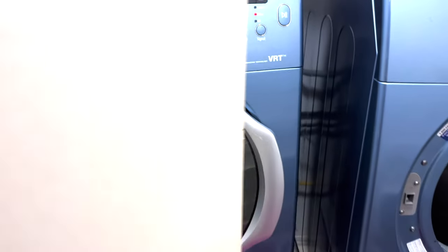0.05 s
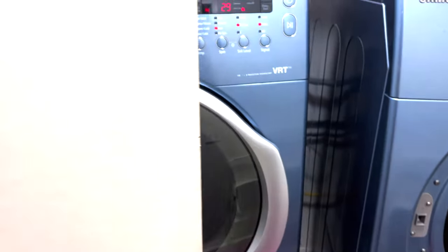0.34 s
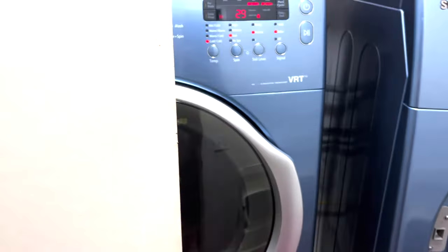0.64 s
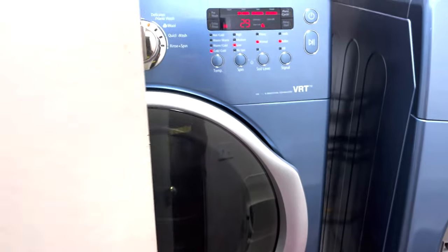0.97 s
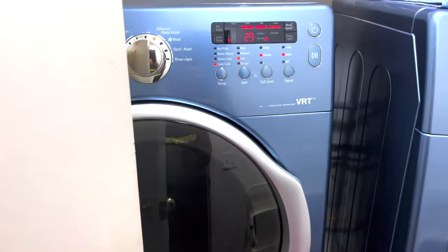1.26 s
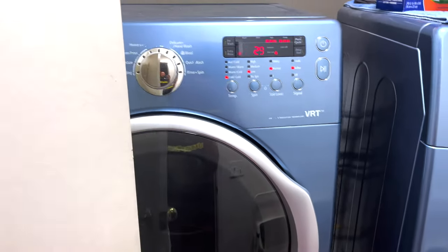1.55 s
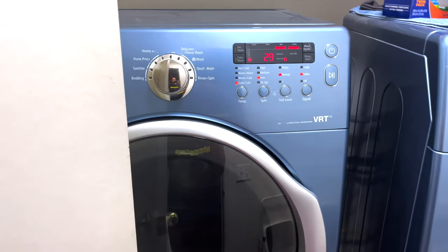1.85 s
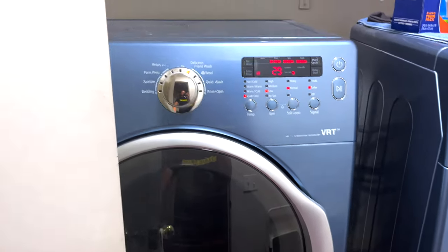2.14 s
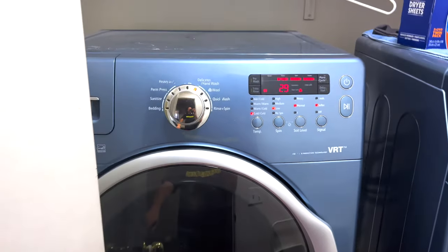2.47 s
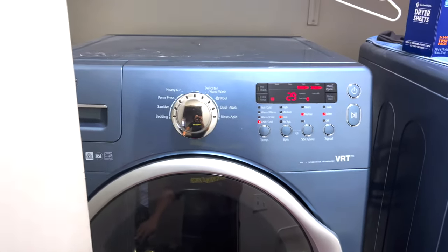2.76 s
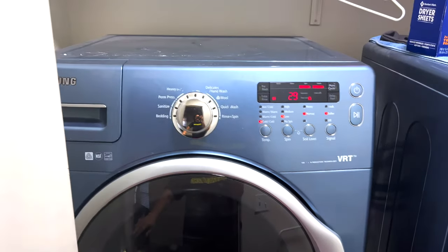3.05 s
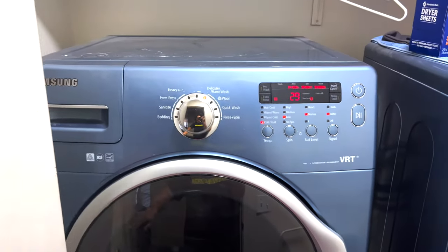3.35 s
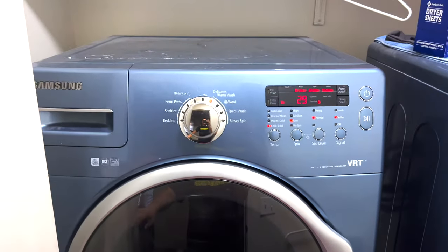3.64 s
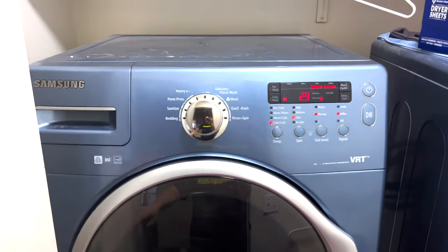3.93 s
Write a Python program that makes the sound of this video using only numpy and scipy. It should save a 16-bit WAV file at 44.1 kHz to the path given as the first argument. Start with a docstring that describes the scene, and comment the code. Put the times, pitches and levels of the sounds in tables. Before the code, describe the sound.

An unbalanced washing machine bangs rapidly and steadily as it spins in a small room.

```python
"""The tub of an unbalanced front-loading washing machine strikes its cabinet once on every turn of the spin.
Each impact excites the sheet metal (a clack and a hollow thump); the tub then rubs along the cabinet
and swings back with a duller thud. The cabinet drones in step with the drum, over the steady rush of
motor and air. Heard from about a metre in a small laundry room; as the listener comes round the door,
the drone and the hollow middle range grow."""
import sys
import numpy as np
from scipy import signal
from scipy.fft import rfft, irfft, next_fast_len
from scipy.io import wavfile
from scipy.ndimage import uniform_filter1d

SR = 44100
rng = np.random.default_rng(int(sys.argv[2]) if len(sys.argv) > 2 else 0)


def put_to_file(sound):
    """Save the sound as 16-bit audio at rate SR, in the file named by the first command-line argument."""
    columns = np.atleast_2d(sound).T  # one column per channel
    safe = np.clip(columns, -1, 1)
    whole_steps = np.round(safe * 32767)
    wavfile.write(sys.argv[1], SR, whole_steps.astype(np.int16))


N = 176400
TURN_S, FIRST_TURN_S, HALFWAY_S = .12, .0755, 2

# impacts of the tub: t/s; the clack's low, middle, clang and treble level/dB; its low boom (applied at
# half its dB value); force of the blow (sets the thump's level/dB and the sharpness of the tick)
STRIKES = [(-0.043, 4, -5, -5, 1, 2.0, 7), (0.077, -6.5, -2.5, 0.7, -3.2, 0.1, -0.5),
           (0.1975, 0.5, -19, -5, -1.9, 4, 2.2), (0.3146, 0.1, 4, -3.5, -1, 8, 1.1),
           (0.4363, 1, 3, 1, -2.7, 2.6, 1.2), (0.5551, -0.8, 3.5, -0.5, -2.5, 7, 1.5),
           (0.6777, 1, 2, 0.7, 1, 4, -0.5), (0.7946, 1.0, 1.0, -8, -4, -5, -2.5),
           (0.9161, -4, 0, -6.2, -2.5, 0.7, 0.2), (1.0368, 3, -1.7, 4.5, -1.7, -3, 0),
           (1.1552, 7, 0.8, 6, 0.5, 1.1, 1.6), (1.2768, 5.0, 2.7, 6.5, 0, 3, 0.3),
           (1.3945, 0.3, -4.5, 2, 0.2, -3, 0.5), (1.5177, 1.5, 5.5, -1, 0.5, -8, -0.5),
           (1.6339, -2.5, 6, -3.5, -2.5, 12, 2.5), (1.7564, 2.7, -4, 1.3, -1.7, 6, 1.4),
           (1.8754, -3.5, -4, 1, -1, -3, -0.5), (1.9971, -0.2, 4.5, -1.5, 0.5, -5, -0.1),
           (2.116, -3, -1, -4.1, -1, -7, -2), (2.236, -5.5, -3, 0.5, -1.5, -6, -0.5),
           (2.3562, -0.7, -0.5, -0.5, -0.3, -2, 0.5), (2.4755, 4.5, -3, 4, 1, -4, 0.5),
           (2.5944, 0.9, 6, -2.5, 0, -1.5, -2), (2.7159, -6, -4, -1, -1.6, -3, -1.5),
           (2.836, 6, 3.5, 5, 0, 3, -0.2), (2.9533, -1.5, 2.5, -6, -1.5, 3, -0.5),
           (3.0789, -2.6, 3, 0.1, -0.7, -1.3, -1.2), (3.1953, -3, -2, -2.0, 1, 1.0, 1),
           (3.3182, -5.5, 2.5, -2.5, -1.5, -1.4, -0.5), (3.4351, 2.5, -1, -0.5, 0.7, 9, 0.5),
           (3.5565, 4, 3, 4, 0.8, -2, -0.5), (3.6731, -0.5, 3.5, 2, -1, 1.5, 0.5),
           (3.7986, 4, -6.5, -1.5, -3.5, 8, 0.5), (3.9151, -1.3, -2, -6.5, 0.2, -1, 0)]


def undb(db):
    """Amplitude ratio of a level."""
    return 10 ** (np.asarray(db) / 20)


def colour(x, points):
    """Zero-phase filter through (f/Hz, gain/dB) points on a logarithmic frequency axis."""
    hz, db = np.array(points, float).T
    size = next_fast_len(x.shape[-1] + 2048)
    f = np.maximum(np.fft.rfftfreq(size, 1 / SR), 1)
    gain = undb(np.interp(np.log(f), np.log(hz), db))
    return irfft(rfft(x, size) * gain, size)[..., :x.shape[-1]]


def causal(x, points):
    """Minimum-phase filter through (f/Hz, gain/dB) points: resonances ring only after the blow."""
    hz, db = np.array(points, float).T
    size = next_fast_len(x.shape[-1] + 4096)
    gain = undb(np.interp(np.fft.rfftfreq(size, 1 / SR), hz, db))
    cepstrum = irfft(np.log(gain), size)
    cepstrum[1:size // 2] *= 2
    cepstrum[size // 2:] = 0
    return irfft(rfft(x, size) * np.exp(rfft(cepstrum)), size)[..., :x.shape[-1]]


def noise(spectrum, shape):
    """Filtered Gaussian noise of rms 1; the spectrum's levels are relative."""
    x = colour(rng.standard_normal(shape), spectrum)
    return x / x.std()


def turn_noises(spectrum, count, size, shared):
    """Partly coherent mid and side noises: a shared fraction of the power repeats on every turn."""
    x = noise(spectrum, (count + 1, 2, size))
    return np.sqrt(shared) * x[0] + np.sqrt(1 - shared) * x[1:]


def add(out, at_s, x):
    """Superpose a sound at a given time."""
    i = int(round(at_s * SR))
    a, b = max(i, 0), min(i + x.shape[-1], N)
    if b > a:
        out[:, a:b] += x[:, a - i:b - i]


def turns():
    """Start time of every period of rotation."""
    return FIRST_TURN_S + TURN_S * np.arange(-1, N / SR / TURN_S)


def rush():
    """Broadband noise of motor and air, a part of it periodic with the rotation."""
    spectrum = [(25, -22), (45, -5), (60, 9.5), (85, 5), (180, -1), (340, -7.5), (420, -5.5), (600, -8),
                (1000, -8), (1600, -12.5), (2500, -18.5), (4000, -21), (6000, -28), (11000, -27.5),
                (14000, -34)]  # motor and air: f/Hz, level/dB
    out, starts, size = np.zeros((2, N)), turns(), int(2 * TURN_S * SR)
    window = np.sin(np.pi * np.arange(size) / size)
    for at, air in zip(starts, turn_noises(spectrum, len(starts), size, shared=.15)):
        add(out, at - TURN_S, air * window)
    return out * undb(-26.5)


def shudder():
    """Forced vibration of loose panels: nearly alike on each turn, shifting slowly with the load."""
    spectrum = [(25, -28), (45, -13), (60, -4), (85, -9), (110, -7), (180, -3.5), (280, -3.5), (340, 0),
                (420, -13.5), (600, -15.5), (1000, -27), (2000, -62)]  # shaking panels: f/Hz, level/dB
    out, starts, size = np.zeros((2, N)), turns(), int(2 * TURN_S * SR)
    window = np.sin(np.pi * np.arange(size) / size)
    pattern, *changes = noise(spectrum, (len(starts) + 1, 2, size))
    correlation = .93
    for at, change in zip(starts, changes):
        pattern = correlation * pattern + np.sqrt(1 - correlation ** 2) * change
        add(out, at - TURN_S, pattern * window)
    return out * undb(-26)


def drone():
    """The cabinet vibrates at harmonics of the turn rate; the seventh is modulated once a turn."""
    sway = [(.002, -16), (.013, -21), (.031, -14.8), (.045, -11.4), (.067, -10.8), (.080, -16), (.092, -26),
            (.106, -16)]  # envelope of the seventh harmonic: t/s within the turn, relative level/dB
    harmonics = [(5, -30), (10, -26)]  # weaker hums: harmonic number, relative level/dB
    trough_s, crest_s, growth_db_per_s = .058, .046, .2
    t = np.arange(N) / SR - FIRST_TURN_S
    at, db = np.array(sway).T
    swell = uniform_filter1d(undb(np.interp(t, at, db, period=TURN_S)), SR // 200)
    seventh = -swell * np.cos(2 * np.pi * 7 * (t - trough_s) / TURN_S)
    hums = sum(undb(level) * np.cos(2 * np.pi * n * (t - crest_s) / TURN_S) for n, level in harmonics)
    return (hums + seventh) * undb(-1.5 + growth_db_per_s * (t - HALFWAY_S))


def rub():
    """Sliding friction: a swell of noise as the tub drags along the cabinet on each turn."""
    spectrum = [(200, -34), (350, 5), (600, 6), (1000, -5), (1400, 0.5), (2200, -20), (5000, -22.5)]  # friction noise: f/Hz, level/dB
    middle_s, half_s = .047, .021
    out, t, starts = np.zeros((2, N)), np.arange(-SR // 16, SR // 16) / SR, turns()
    swell = np.exp(-(t / half_s) ** 2) * undb(-25.5)
    for at, friction in zip(starts, turn_noises(spectrum, len(starts), len(t), shared=.42)):
        add(out, at + middle_s + t[0], friction * swell)
    return out


def whirrs():
    """Friction excites short rising tones at the same points of every turn."""
    # glides: t/s within the turn, f/Hz, rise/(Hz/s), half length/s, level/dB, growth/(dB/s)
    glides = [(0.029, 330, 8200, 0.015, -37, 9), (0.037, 890, 15300, 0.012, -28.5, -0.5),
              (0.072, 1110, 6600, 0.01, -30.5, 1.5)]
    out, t, starts = np.zeros((2, N)), np.arange(-SR // 20, SR // 20) / SR, turns()
    for middle, hz, rise, half, db, growth in glides:
        swell = np.exp(-(t / half) ** 2)
        for at, (tune, size, mid_phase, side_phase) in zip(starts, rng.normal(size=(len(starts), 4))):
            cycles = (hz * t + rise * t ** 2 / 2) * (1 + .037 * tune)
            tone = np.sin(2 * np.pi * (cycles + np.array([[mid_phase], [side_phase]])))
            add(out, at + middle + t[0], tone * swell * undb(db + growth * (at - HALFWAY_S) + 2 * size))
    return out


def panel_pulses(modes, times, levels_db):
    """Under soft blows, damped panel modes swell and die in a few cycles, never quite alike."""
    out, t = np.zeros((2, N)), np.arange(-SR // 25, SR // 25) / SR
    detune, scatter_db, jitter_s = .012, .5, .0002
    for k, (delay, hz, db, half) in enumerate(modes):
        draws = rng.standard_normal((len(times), 4))
        for at, blow_db, (size, tune, late, skew) in zip(times, levels_db, draws):
            swell = undb(db + blow_db + scatter_db * size) / np.cosh(t / half) ** 1.9
            phase = 2 * np.pi * hz * (1 + detune * tune) * t
            side = (-1) ** k * undb(-9) * hz / 280 * np.sin(phase + .34 * skew)
            add(out, at + delay + jitter_s * late + t[0], swell * np.array([-np.cos(phase), side]))
    return out


def thuds():
    """The tub's return swing excites low panel modes."""
    modes = [(.024, 149, -16.5, 0.003), (.0438, 290, -17.5, 0.0041), (.0545, 194.6, -10.5, 0.0057),
             (.081, 263, -20, 0.0049), (.089, 176, -21, 0.0034), (.107, 148, -21, 0.008)]  # panel pulses: peak t/s within the turn, f/Hz, level/dB, half length/s
    starts = turns()
    return panel_pulses(modes, starts, np.zeros(len(starts)))


def thumps():
    """Each impact excites the hollow-sounding modes of the panels in proportion to its force."""
    modes = [(.0042, 496, -21, 0.0051), (.009, 279.4, -10, 0.0062), (.0242, 303, -14, 0.0053),
             (.035, 356, -17.5, 0.0041)]  # panel pulses: peak t/s after impact, f/Hz, relative level/dB, half length/s
    times, *_, force_db = np.array(STRIKES).T
    return panel_pulses(modes, times, force_db)


def sheet_metal(x):
    """Modal response of the cabinet: a few strong resonances among many weak ones."""
    resonances = [(1580, 43, 8), (1770, 45, 5.5), (2084, 52, 5.5), (2424, 79, 7), (2925, 100, 3),
                  (3250, 66, 8.5), (3594, 69, 4.5), (4810, 60, 5.5)]  # sheet-metal modes: f/Hz, bandwidth/Hz, gain/dB
    hz, weak_hz = np.arange(10, SR / 2, 10), np.arange(0, SR / 2, 55)
    ripple = np.interp(hz, weak_hz, rng.uniform(-1, 1, len(weak_hz))) * np.sqrt(3)
    weak_db = 1.4 * ripple * np.clip(hz / 1500 - .5, 0, 1)
    strong_db = sum(db / (1 + (2 * (hz - centre) / width) ** 2) for centre, width, db in resonances)
    return causal(x, np.column_stack([hz, strong_db + weak_db]))


def clacks():
    """Impact excitation: the tub grazes, hits and chatters; cabinet and room ring down exponentially."""
    ring_spectrum = [(100, -32), (200, 16), (300, -6), (450, 10), (800, 1), (1200, -8), (1700, 1.5),
                     (2300, -5), (3200, -4.5), (3900, -4.5), (4600, -3), (5500, -11.5), (6600, -8.5),
                     (10000, -15), (14000, -20)]  # dense modes of cabinet and room: f/Hz, level/dB
    crack_spectrum = [(500, -13), (1200, -1), (1600, -1.5), (2200, 1), (2600, 1.5), (3200, -7),
                      (3800, -13.5), (4700, -7.5), (6000, -10), (10000, -9.5), (14000, -14.5)]  # first contact: f/Hz, level/dB
    snap_spectrum = [(1000, -20), (3000, -10), (6000, 2), (14000, -0.5)]  # hard parts meeting: f/Hz, level/dB
    band_edges = [380, 700, 1500, 2280, 2420, 2830, 2970, 3600, 4300]  # boom, low, middle, clang and treble ranges: f/Hz
    t60_s, rise_s, crack_s, snap_s = .25, .003, .0024, .0012
    chatter_gap_s, chatter_fade_db = .006, 2.6
    out, t, short = np.zeros((2, N)), np.arange(SR // 4) / SR, SR // 50
    hz = np.arange(0, SR / 2, 130)
    rings = turn_noises(ring_spectrum, len(STRIKES), len(t), shared=.5)
    rings *= undb(-19.5 - 60 * t / t60_s) * (1 - np.exp(-t / rise_s))
    cracks = turn_noises(crack_spectrum, len(STRIKES), short, shared=.5)
    cracks *= undb(-18) * np.exp(-t[:short] / crack_s)
    snap_decay = undb(-25) * np.exp(-t[:short] / snap_s)
    for (at, low, middle, clang, treble, boom, force), clack, crack in zip(STRIKES, rings, cracks):
        add(out, at - .0036, crack * undb(-12.5))  # graze just ahead of the blow
        snap = noise(snap_spectrum, (2, short)) * snap_decay
        clack[:, :short] += (snap + crack * undb(.3)) * undb(1.2 * force)
        for k, (late, size) in enumerate(rng.standard_normal((6, 2)), 1):
            i = int(SR * chatter_gap_s * k * (1 + .15 * np.tanh(late)))
            clack[:, i:i + short] += crack * undb(2 * size - chatter_fade_db * k - force / 2)
        # every strike lands a little differently and favours other pitches
        band_db = np.interp(hz, band_edges, [boom / 2, 0, low, low, middle, middle, clang, clang, treble])
        ripple_db = 1.6 * rng.standard_normal(len(hz)) * np.clip(hz / 3000, 0, 1.4)
        add(out, at, causal(clack, np.column_stack([hz, band_db + ripple_db])))
    return sheet_metal(out)


def scene():
    """Superposition in mid and side: the bass is central; wall reflections spread the higher sounds."""
    width = [(60, -5.5), (110, -13), (200, -7), (380, -2.5), (690, -5), (1280, -0.5), (2360, -6.5),
             (4350, -4.5), (7000, -3.5), (10000, -2), (14000, -1.5)]  # spread of the room sound: f/Hz, side minus mid level/dB
    lean = [(60, -0.3), (170, 0.5), (400, 0.8), (1200, 0.4), (2400, 0.5), (4400, 2.9), (8000, -1)]  # balance between the ears: f/Hz, left minus right level/dB
    hollow_band = [(330, -30), (470, 0), (680, 0), (1000, -30)]  # hollow middle range: f/Hz, gain/dB
    mid, side = clacks() + rub() + whirrs() + rush() + shudder()
    low_mid, low_side = thumps() + thuds()
    mid = mid + low_mid + drone()
    side = colour(side, width) + low_side
    ears = np.array([colour(mid + way * side, [(hz, way * db / 2) for hz, db in lean]) for way in (1, -1)])
    growth = undb(1.15 * (np.arange(N) / SR - HALFWAY_S))  # the listener comes round the door
    return ears + colour(ears, hollow_band) * (growth - 1)


def record(dry):
    """The microphone pair notches the treble; saturation rounds the peaks and a low-pass cuts the top."""
    mid_response = [(10, -32), (25, -22), (38, 2), (7000, -1), (7700, -9.5), (8300, -36), (8900, -12),
                    (9500, -4), (13000, 0), (14300, -8), (15400, -32)]  # response to the sum: f/Hz, gain/dB
    side_response = [(10, -30), (38, -2), (9500, 2), (10700, -10), (11500, -18), (12400, -20), (13200, -6),
                     (15700, 2)]  # response to the difference: f/Hz, gain/dB
    mid = colour((dry[0] + dry[1]) / 2, mid_response)
    side = colour((dry[0] - dry[1]) / 2, side_response)
    x = np.array([mid + side, mid - side])
    x = x / (1 + (x / .95) ** 6) ** (1 / 6)
    return signal.sosfilt(signal.ellip(8, .2, 70, 15700, fs=SR, output="sos"), x)


dry = scene()
out = record(dry)
put_to_file(out)
```